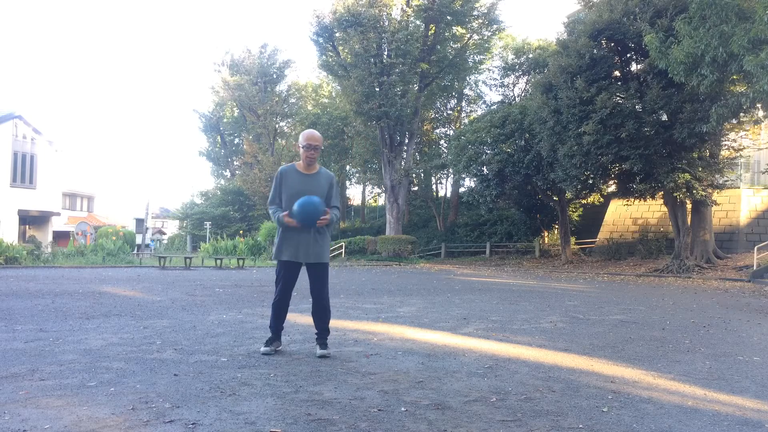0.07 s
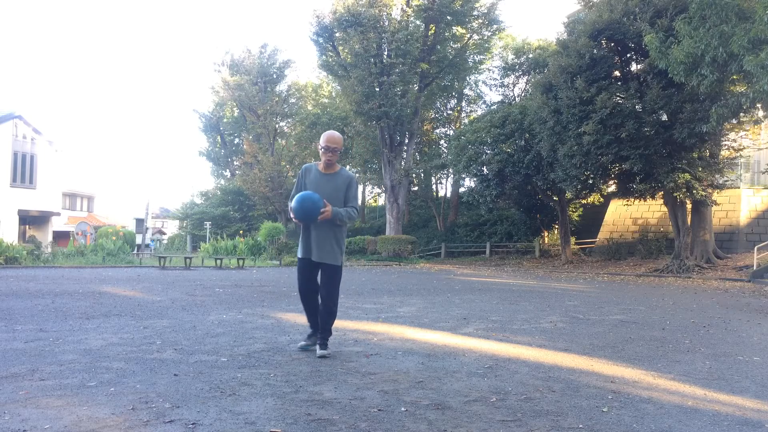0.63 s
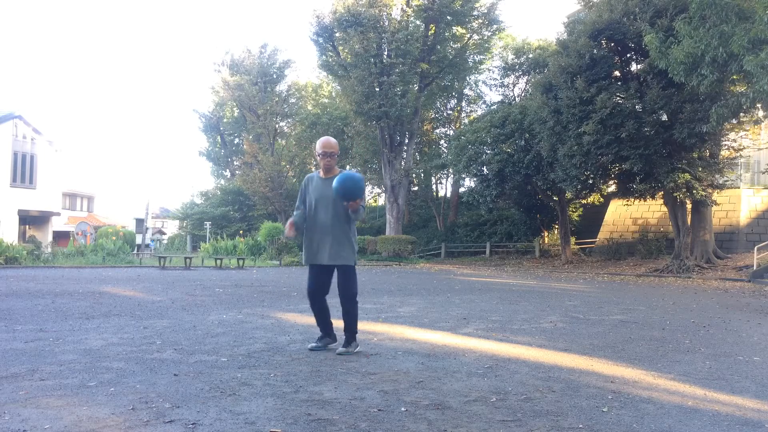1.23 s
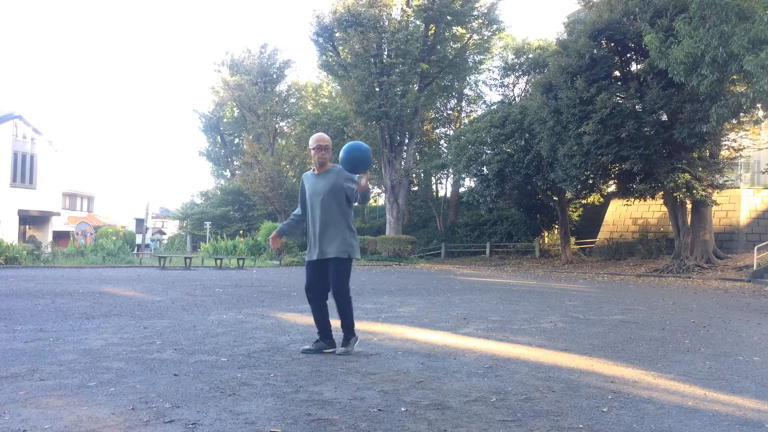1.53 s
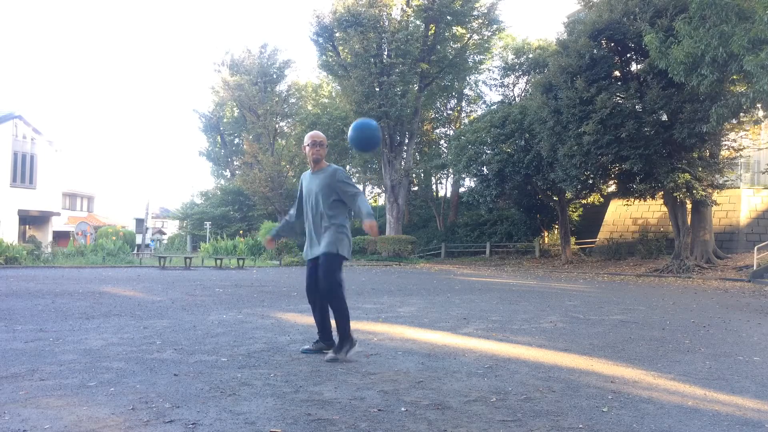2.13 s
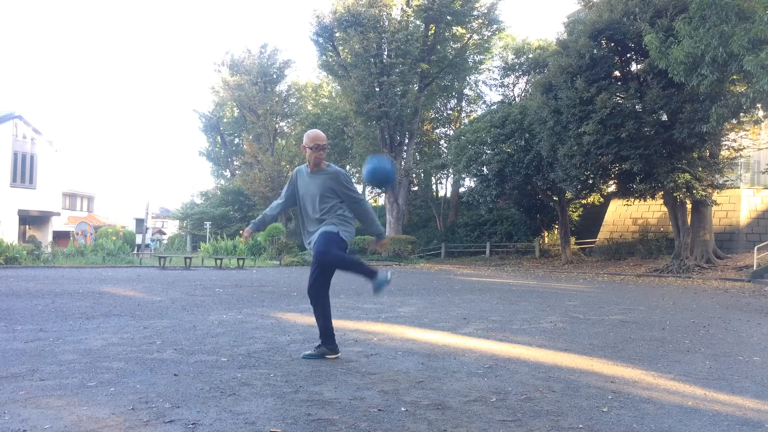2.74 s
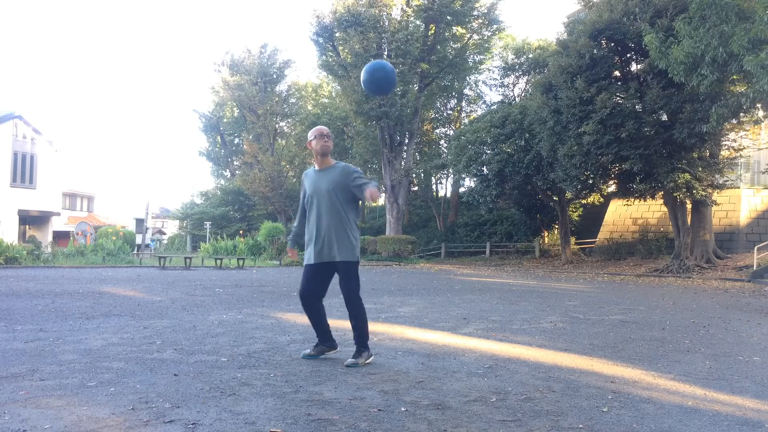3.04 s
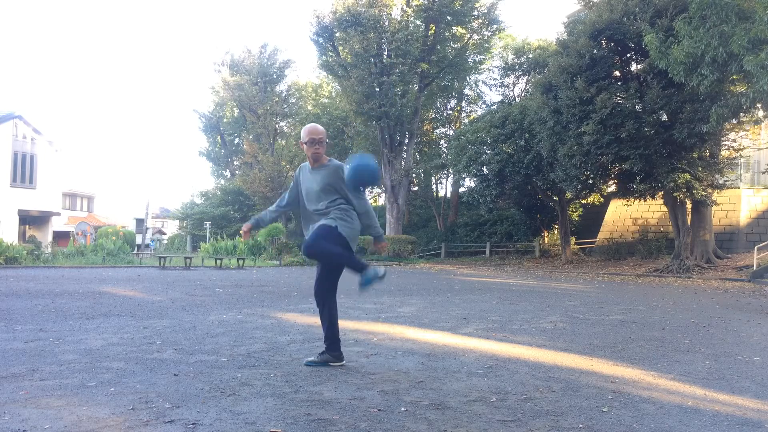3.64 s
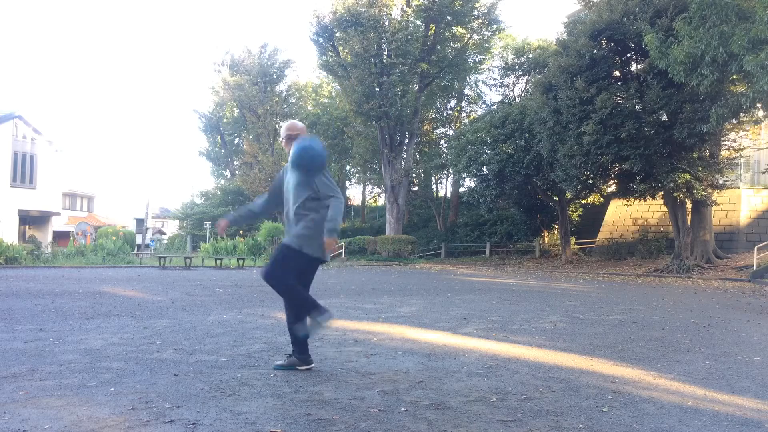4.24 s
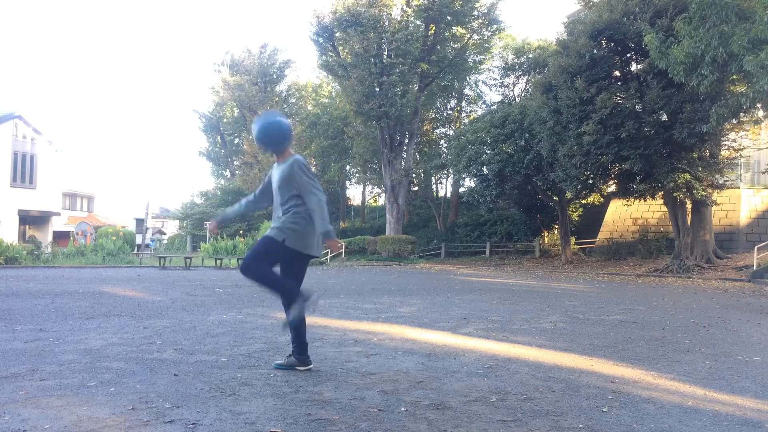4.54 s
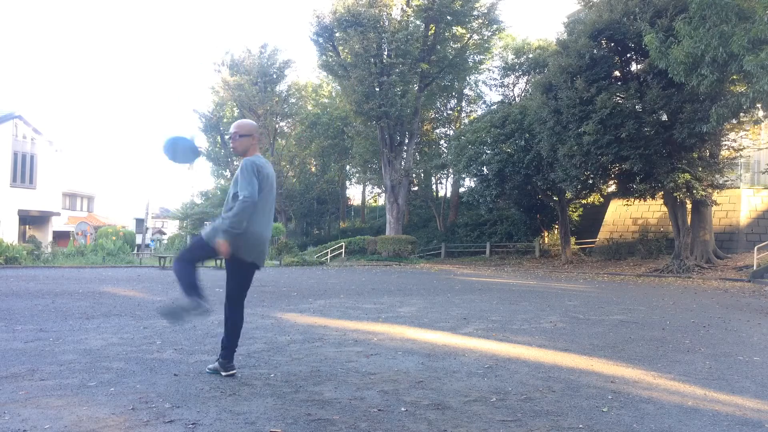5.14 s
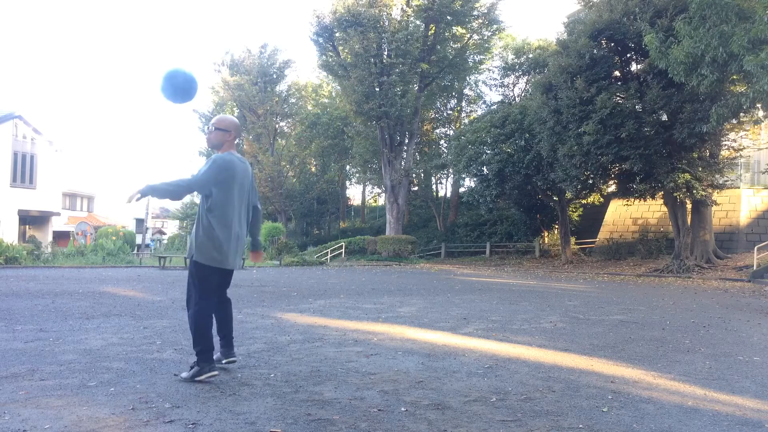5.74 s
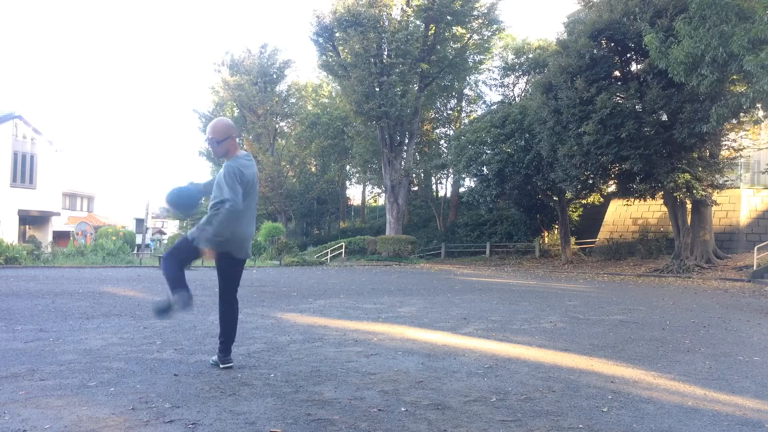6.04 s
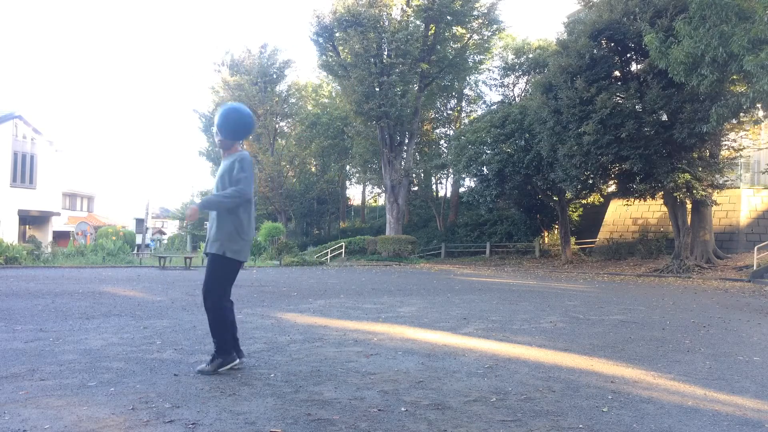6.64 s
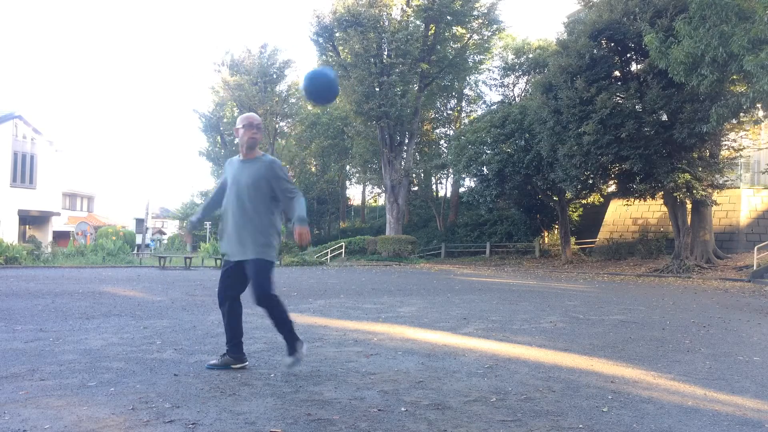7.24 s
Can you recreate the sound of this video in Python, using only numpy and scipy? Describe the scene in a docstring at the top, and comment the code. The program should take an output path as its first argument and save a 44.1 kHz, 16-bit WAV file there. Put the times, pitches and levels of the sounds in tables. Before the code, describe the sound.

Sharp, regular thuds of a football being juggled by foot outdoors, with soft gravel steps between them and a faint distant town rumble.

```python
"""First come a far town rumble, insects and a rustle of clothes; a football slides through the hands.
Then the ball is kept in the air with seven kicks, on gravel in a park. Each kick squashes the ball,
slaps its skin and rings the air inside; the slap and the air's ring also bounce off the ground.
Shoes crunch and trousers swish between the kicks, and trees and houses scatter the sounds back."""
import sys
import numpy as np
from scipy import signal
from scipy.fft import rfft, irfft
from scipy.io import wavfile

SR = 44100
rng = np.random.default_rng(int(sys.argv[2]) if len(sys.argv) > 2 else 0)


def master(y):
    """Save y as 16-bit WAV."""
    cut = np.clip(np.atleast_2d(y).T, -1, 1)
    pcm = np.round(cut * 32767)  # scale
    wavfile.write(sys.argv[1], SR, pcm.astype(np.int16))


N = 321489

# One row a kick: (time [s], thump [dB], thump pitch [Hz], skin ring [dB], air ring [dB],
# air pitch [factor], pitch the blow favours [Hz], slap [dB], slap tilt [dB/octave], ground echo lag [ms])
# A tilt above zero makes a sound brighter; below zero, duller.
BALL_KICKS = [(1.9705, -14, 130, -6.5, -4.5, 1.05, 1360, -1.5, 3, 0.71),
              (2.7526, -10, 116, -3, 0, 0.99, 1100, -3.5, 1, 0.73),
              (3.661, -7.5, 111, 0, 2.5, 0.94, 990, -2.5, 1.5, 0.85),
              (4.4925, -9.5, 121, 0, -0.5, 1.08, 2300, -2.5, 1, 0.77),
              (5.3762, -7, 117, 0, -4, 1.02, 1200, -1.5, -1.5, 0.92),
              (6.2373, -9.5, 103, 0.5, -2.5, .93, 1710, -8, 1.5, 0.66),
              (7.0380, -14, 108, 1.5, 1, 1.03, 1250, -0.5, 3.5, 0.71)]
# Tones of the bending skin, left to ring freely: (pitch [Hz], level [dB], time to fall 60 dB [s])
SKIN_TONES = [(154.5, -19.5, 0.051), (203.3, -17.5, 0.069), (401, -27, 0.1), (464.5, -29.5, 0.086),
              (561, -37.5, 0.11), (705, -33, 0.067), (812, -35, 0.075)]
# Tones of the air in the ball, left to ring freely: (pitch [Hz], level [dB], time to fall 60 dB [s])
AIR_TONES = [(990, -22, 0.032), (1094, -18.5, 0.043), (1189, -19.5, 0.024), (1457, -33, 0.055),
             (1755, -23, 0.036), (2200, -33, 0.074), (3410, -34.5, 0.057)]
# The slap's colour, or how strong its lows and highs are: (frequency [Hz], level [dB])
SLAP_COLOUR = [(150, -15), (500, -0.5), (1200, 1.5), (1800, -1), (2800, -4.5), (4200, -2), (6500, 1),
               (8000, -7), (11000, -17.5), (16000, -27)]
# One row a step: (time [s], crunch [dB], tilt [dB/octave], sole knock [dB],
# time to roll flat [s], crunch of the flat foot [dB])
STEPS = [(1.260, -43.5, 5, -49, 0.067, -46.5), (1.604, -40.5, 0.5, -48, 0.045, -44.5),
         (2.268, -42, 3.5, -32, 0.018, -46), (2.478, -34.5, 2, -42.5, 0.035, -42),
         (3.074, -65, 10, -43, .028, -47), (3.328, -27.5, 1, -44.5, 0.048, -41),
         (3.955, -38.5, 9, -33.5, .02, -54), (4.193, -27.5, 1, -38.5, 0.034, -54),
         (4.816, -52.5, 2, -45.5, .016, -47.5), (5.060, -32, 2, -50, .038, -42),
         (5.692, -39, 5, -36, 0.053, -50.5), (5.952, -35, 2, -44.5, 0.026, -48.5),
         (6.525, -34, 2.5, -31.5, .035, -57)]
# Colour of crunching gravel: (frequency [Hz], level [dB])
GRAVEL_COLOUR = [(200, -22), (550, -4), (900, -6), (1400, 1), (2000, -1.5), (2700, -5), (3500, -1.5),
                 (5000, -1.5), (6500, -1), (8500, -9), (9600, -17), (11800, -28.5), (14000, -27),
                 (16000, -47)]
# Colour of the sole's knock: (frequency [Hz], level [dB])
SOLE_COLOUR = [(60, -5), (150, -15), (260, -8.5), (420, 5.5), (650, -6.5), (950, -6.5), (1500, -16),
               (4000, -35)]
# Coarse stones grating under the sole: (time [s], level [dB], pitch [Hz], decay time [s])
GRATING_STONES = [(1.304, -38, 3800, 0.0039), (1.605, -38.5, 1860, 0.014), (2.523, -33, 4730, 0.0021),
                  (4.196, -40, 2060, 0.026), (4.441, -41, 2200, 0.013), (5.303, -41.5, 2020, 0.016),
                  (6.827, -34, 2420, 0.0026)]
# Ticks of grit or of a hand on the ball: (time [s], level [dB], tilt [dB/octave])
LIGHT_TICKS = [(.092, -49.5, 1), (1.004, -39, 5), (1.304, -40, 3), (1.529, -52, 5), (2.357, -47, 3),
               (2.523, -35, -0.5), (4.569, -35.5, 1), (4.725, -48, 0), (4.867, -47, 7), (6.825, -44, -3)]
# Swings of a leg or arm in loose cloth: (peak time [s], level [dB], half length [s], tilt [dB/octave])
CLOTH_SWISHES = [(.13, -62, .04, 0), (0.323, -55, 0.052, 2.5), (.872, -52.5, 0.014, 4.5),
                 (1.009, -51, 0.036, -0.5), (1.871, -57.5, 0.051, 0), (2.712, -55.5, 0.02, -2.5),
                 (3.606, -48.5, 0.057, -1), (4.443, -44, 0.032, -1), (5.308, -44.5, 0.045, -1),
                 (5.37, -38, 0.0096, -3), (6.187, -50.5, 0.041, -1.5), (6.794, -44.5, 0.039, -2)]
# Colour of rubbing cloth: (frequency [Hz], level [dB])
CLOTH_COLOUR = [(200, -17), (900, 0), (2000, 2.5), (3200, 5.5), (6300, 5.5), (8500, 0), (12000, -15.5),
                (16000, -19)]
# Colour of the ball sliding through the hands: (frequency [Hz], level [dB])
RUB_COLOUR = [(1000, -21), (2900, -18), (3200, -11), (3420, -6), (3700, -9), (5300, -7), (6000, 5.5),
              (6700, 0), (7700, -8), (8300, -20), (16000, -48)]
# Soft low bumps of air or ground: (time [s], level [dB], pitch [Hz])
LOW_BUMPS = [(3.405, -37, 115), (5.653, -34.5, 110), (6.47, -30, 83)]
# Colour of the echo from trees and houses: (frequency [Hz], level [dB])
ECHO_COLOUR = [(80, 3), (300, -24.5), (600, -15.5), (1200, -21.5), (3000, -15), (6500, -14), (10000, -11.5),
               (16000, -26)]
# How long that echo lasts: (frequency [Hz], time to fall 60 dB [s])
ECHO_FADE = [(100, 0.88), (1000, 0.55), (3000, 1), (6500, 0.56), (14000, 0.34)]
# Colour of the far town and the leaves: (frequency [Hz], level [dB])
TOWN_COLOUR = [(20, -17), (40, -4), (65, 5.5), (110, 1), (180, -1), (250, -6.5), (350, -16), (600, -19),
               (1050, -19), (1700, -27), (2900, -36), (6500, -30.5), (10000, -39), (16000, -47.5)]
# Insect choirs in the trees: (pitch [Hz], half width [Hz], level [dB], starting throb depth [dB])
INSECT_CHOIRS = [(4310, 440, -65.5, 2), (6600, 610, -66.5, -0.5)]


def kicks(skin_detune=0.025, skin_ring_share=0.86, rasp_tilt_db=-0.7, echo_db=2):
    """Shoe meets ball: the skin cracks and rasps, skin and air ring, and the squashed ball thumps."""
    out, t = np.zeros(N), np.arange(SR // 8) / SR
    # the contact spreads, buzzes on, then lets go
    contact = gain_of(-13) * np.exp(-t / 0.002) + gain_of(-32) * np.exp(-t / 0.009)
    contact += gain_of(-34) * bell(t - 0.0104, half_s=0.0005)
    for (s, thump_db, thump_hz, skin_db, air_db, air_pitch,
         favoured_hz, slap_db, tilt_db, lag_ms) in BALL_KICKS:
        crack = gain_of(slap_db) * coloured(1.0 * (t == 0), SLAP_COLOUR, tilt_db)
        friction = contact * rng.choice([-1, 1], len(t))
        rasp = gain_of(slap_db) * coloured(friction, SLAP_COLOUR, tilt_db + rasp_tilt_db)
        air = gain_of(air_db) * ring(struck_air(air_pitch, favoured_hz), t, attack_s=0.00072)
        # the foot shortens the skin's ring and tunes it a little differently each time
        skin_pitch = 1 + skin_detune * rng.uniform(-0.92, 1)
        skin_tones = [(hz * skin_pitch, db, fade_s * skin_ring_share) for hz, db, fade_s in SKIN_TONES]
        skin = gain_of(skin_db) * ring(skin_tones, t, attack_s=0.0019)
        add(out, s, ground_bounce(air - crack - rasp, lag_ms, share=0.57) + skin)
        add(out, s, gain_of(echo_db) * park_echo(air + skin - crack))
        offset_s, wobble = thump(thump_hz)
        add(out, s + offset_s, gain_of(thump_db) * wobble)
    return out


def thump(hz, peak_s=0.0023, rise_s=0.0032, fall_s=0.0069):
    """The squashed ball wobbles back. Gives (start time counted from the touch [s], sound)."""
    t = np.arange(-SR // 100, SR // 20) / SR
    swell = bell(t, np.where(t < 0, rise_s, fall_s))
    return peak_s + t[0], swell * np.cos(2 * np.pi * hz * t)


def struck_air(pitch, favoured_hz, fall_db_per_octave=5, ring_share=0.91):
    """The squash retunes the air's tones, the blow favours some, and the foot shortens their ring."""
    return [(hz * pitch, db - fall_db_per_octave * abs(np.log2(hz / favoured_hz)), fade_s * ring_share)
            for hz, db, fade_s in AIR_TONES]


def ring(tones, t, attack_s):
    """A blow takes a moment to set the tones going; then each dies away at its own speed."""
    ringing = sum(gain_of(db - 60 * t / fade_s) * np.sin(2 * np.pi * hz * t) for hz, db, fade_s in tones)
    return (1 - np.exp(-t / attack_s)) * ringing


def steps(knock_s=0.0053, skid_doubles_rise_db=22.5, settle_db=-53):
    """The sole knocks and grinds the gravel, grinds again as it rolls flat, and the grit settles."""
    out, t = np.zeros(N), np.arange(SR // 4) / SR
    for s, crunch_db, tilt_db, knock_db, roll_s, flat_db in STEPS:
        # a skidding shoe (more crunch than knock) builds up more slowly
        rise_s = 0.0052 * 2 ** ((crunch_db - knock_db) / skid_doubles_rise_db)
        touch = press(t, rise_s, decay_s=0.013) * grit(t, tilt_db, per_s=4500, spread_db=3)
        flat = press(t - roll_s, rise_s=0.012, decay_s=0.015)
        flat *= grit(t, tilt_db - 1, per_s=4000, spread_db=4)
        settle = press(t, rise_s=0.033, decay_s=0.049) * grit(t, tilt_db=2, per_s=900, spread_db=2.5)
        crunch = gain_of(crunch_db) * touch + gain_of(flat_db) * flat + gain_of(settle_db) * settle
        sole = coloured(rng.choice([-1, 1], len(t)), SOLE_COLOUR) * np.exp(-t / knock_s)
        # even out the energy, so only the step's weight (knock_db) sets it
        knock = sole * np.sqrt(knock_s * SR / 2) / np.linalg.norm(sole)
        add(out, s, crunch + gain_of(knock_db) * knock)
    return out


def grit(t, tilt_db, per_s, spread_db, patchy_db=1.8):
    """Bits of gravel click together; each patch of ground has its own colour."""
    patch = [(hz, db + patchy_db * rng.standard_normal()) for hz, db in GRAVEL_COLOUR]
    return evened(coloured(grains(t, per_s, spread_db), patch, tilt_db))


def stones(sharpness=5):
    """A larger stone slips in quick jerks that all ring near one pitch."""
    out, t = np.zeros(N), np.arange(SR // 10) / SR
    for s, db, hz, decay_s in GRATING_STONES:
        jerks = grains(t, per_s=2200, spread_db=1.5)
        ringing = signal.lfilter(*signal.iirpeak(hz, sharpness, SR), jerks)
        add(out, s, gain_of(db) * evened(ringing) * np.exp(-t / decay_s))
    return out


def ticks():
    """Brief gritty touches with no weight behind them."""
    out, t = np.zeros(N), np.arange(SR // 10) / SR
    pressure = press(t, rise_s=0.0011, decay_s=0.0043)
    for s, db, tilt_db in LIGHT_TICKS:
        add(out, s, gain_of(db) * pressure * grit(t, tilt_db, per_s=8000, spread_db=2))
    return out


def swishes():
    """Cloth rubs on cloth, loudest where the leg or arm moves fastest."""
    out, t = np.zeros(N), np.arange(SR // 2) / SR
    middle_s = t.mean()
    for s, db, half_s, tilt_db in CLOTH_SWISHES:
        rub = evened(coloured(grains(t, per_s=9000, spread_db=6), CLOTH_COLOUR, tilt_db))
        add(out, s - middle_s, gain_of(db) * rub * bell(t - middle_s, half_s))
    return out


def hand_slide(start_s=0.92, rise_s=0.058, hold_s=0.17, fade_s=0.08, rub_db=-49.5,
               squeak_peak_s=1.11, squeak_hz=3360, glide_hz=200, squeak_width_hz=190, squeak_db=-58):
    """Palm and sleeve rub over the ball as it is tossed up, and a thin rising squeak joins in."""
    out, t = np.zeros(N), np.arange(SR // 2) / SR
    length_s = rise_s + hold_s + fade_s
    pressure = np.clip(np.minimum(t / rise_s, (length_s - t) / fade_s), 0, 1)
    rub = coloured(grains(t, per_s=9000, spread_db=-1), RUB_COLOUR)
    rub = evened(ground_bounce(rub, lag_ms=1.35, share=0.33))
    smoothing = signal.butter(2, squeak_width_hz / 2, fs=SR, output="sos")
    flutter = signal.sosfilt(smoothing, rng.standard_normal(len(t)))
    hz = squeak_hz + glide_hz * (t / length_s) ** 2
    tone = np.sin(2 * np.pi * np.cumsum(hz) / SR)
    squeak = evened(flutter * tone) * bell(start_s + t - squeak_peak_s, half_s=0.11)
    add(out, start_s, gain_of(rub_db) * pressure * rub + gain_of(squeak_db) * squeak)
    return out


def bumps():
    """Air or ground gives a dull low push, only a wave or two long."""
    out, t = np.zeros(N), np.arange(-SR // 20, SR // 20) / SR
    for s, db, hz in LOW_BUMPS:
        add(out, s + t[0], gain_of(db) * bell(t, half_s=0.0081) * np.cos(2 * np.pi * hz * t))
    return out


def park_echo(sound, build_s=0.0024, cluster_s=0.031, cluster_decay_s=0.004, cluster_db=2):
    """Trees and houses send back an early cluster of echoes and a thin tail, different at every spot."""
    t = np.arange(SR // 2) / SR
    cluster = gain_of(cluster_db) * (t > cluster_s) * np.exp(-abs(t - cluster_s) / cluster_decay_s)
    echoes = evened(grains(t, per_s=6000, spread_db=-0.5)) * (1 - np.exp(-t / build_s) + cluster)
    # split into frequency bands, so each can fade at its own speed
    hz, band_t, bands = signal.stft(echoes, SR, nperseg=256)
    fade_s = look_up(ECHO_FADE, hz)[:, None]
    even_energy = np.sqrt(2 * np.log(1000) / (fade_s * SR))
    fading = gain_of(look_up(ECHO_COLOUR, hz)[:, None] - 60 * band_t / fade_s)
    tail = signal.istft(bands * even_energy * fading, SR, nperseg=256)[1]
    return signal.oaconvolve(sound, tail)[:N]


def town(level_db=-48.5, swell_db=1.35):
    """The far town rumbles and leaves hiss, in one noise that gently swells and sinks."""
    hz = np.fft.rfftfreq(N, 1 / SR)
    rumble = shaped_noise(gain_of(look_up(TOWN_COLOUR, hz)))
    return gain_of(level_db + swell_db * drift(rate_hz=4.5)) * rumble


def insects(throbs_per_s=2.83, first_peak_s=0.034, throb_fade_s=5, waver_db=-1.2):
    """Insects sing in narrow bands of high noise, with a shared throb that slowly evens out."""
    out, t = np.zeros(N), np.arange(N) / SR
    hz = np.fft.rfftfreq(N, 1 / SR)
    throb = np.cos(2 * np.pi * throbs_per_s * (t - first_peak_s)) * np.exp(-t / throb_fade_s)
    for song_hz, width_hz, db, throb_db in INSECT_CHOIRS:
        song = shaped_noise(1 / (1 + ((hz - song_hz) / width_hz) ** 2))
        out += gain_of(db + throb_db * throb + waver_db * drift(rate_hz=12)) * song
    return out


def ground_bounce(sound, lag_ms, share):
    """The hard ground adds a weaker copy of the sound a moment later."""
    at = np.arange(len(sound))
    return sound + share * np.interp(at - round(lag_ms * SR / 1000), at, sound, left=0)


def grains(t, per_s, spread_db):
    """Tiny impacts of unequal size at random times."""
    size = gain_of(spread_db * np.minimum(rng.exponential(1, len(t)), 4))
    return size * rng.choice([-1, 1], len(t)) * (rng.random(len(t)) < per_s / SR)


def press(t, rise_s, decay_s):
    """Pressure builds evenly, then dies away."""
    return np.clip(t / rise_s, 0, 1) * np.exp(-np.maximum(t - rise_s, 0) / decay_s)


def bell(t, half_s):
    """A smooth hump that peaks at time zero."""
    return np.exp(-(t / half_s) ** 2)


def coloured(sound, colour, tilt_db=0, size=4096):
    """Gives a sound a colour, with the highs tilted around 4000 Hz."""
    hz = abs(np.fft.fftfreq(size, 1 / SR))
    octaves = np.log2(np.maximum(hz, 1200) / 4000)
    log_gain = np.log(gain_of(look_up(colour, hz) + tilt_db * octaves))
    # the filter is a click of this colour that starts at once and has energy 1
    click = np.fft.ifft(np.exp(np.conj(signal.hilbert(log_gain)))).real[:size // 2]
    return signal.fftconvolve(sound, click / np.linalg.norm(click))[:len(sound)]


def shaped_noise(gains):
    """Steady noise with its frequencies weighted by the gains."""
    return evened(irfft(rfft(rng.standard_normal(N)) * gains, N))


def drift(rate_hz):
    """A slow random curve that wanders around zero."""
    hz = np.fft.rfftfreq(N, 1 / SR)
    return shaped_noise((hz > 0) * np.exp(-(hz / rate_hz) ** 2))


def look_up(table, hz):
    """Reads between a table's rows, with octaves evenly spaced."""
    row_hz, values = np.transpose(table)
    return np.interp(np.log(hz + 1), np.log(row_hz + 1), values)


def gain_of(db):
    """Turns decibels into a number to multiply by."""
    return 10 ** (np.asarray(db) / 20)


def evened(sound):
    """Scales a sound to an average strength (rms) of 1."""
    return sound / np.sqrt(np.mean(sound ** 2) + 1e-20)


def add(mix, s, sound):
    """Mixes a sound in, starting at s seconds."""
    part = mix[max(round(s * SR), 0):][:len(sound)]
    part += sound[:len(part)]


def scene():
    """The ball, the player and the park around them, in one channel."""
    player = steps() + ticks() + stones() + swishes() + hand_slide()
    return (kicks() + player + park_echo(player) + bumps() + town() + insects())[None]


def record(dry, low_cut_hz=42, high_cut_hz=16600):
    """Trims away the deepest rumble and the very highest hiss."""
    low_cut = signal.butter(2, low_cut_hz, "highpass", fs=SR, output="sos")
    high_cut = signal.firwin(255, high_cut_hz, window=("kaiser", 9), fs=SR)
    return signal.oaconvolve(signal.sosfilt(low_cut, dry), high_cut[None], "same")


dry = scene()
out = record(dry)
master(out)
```